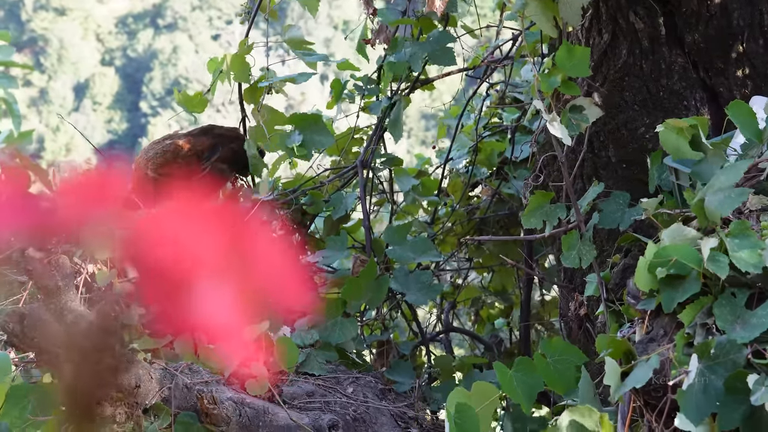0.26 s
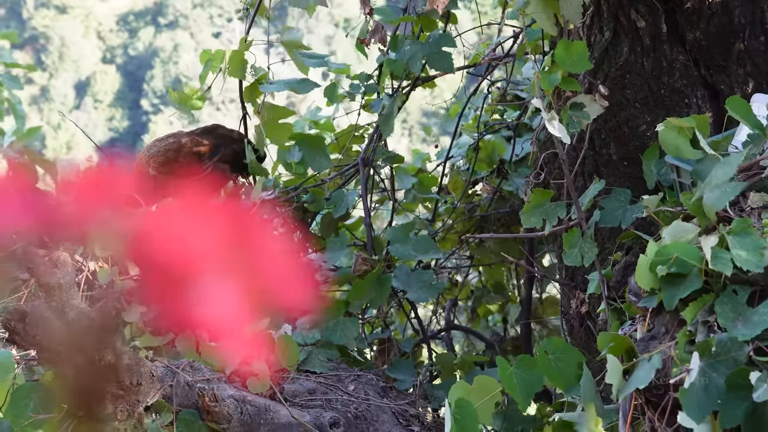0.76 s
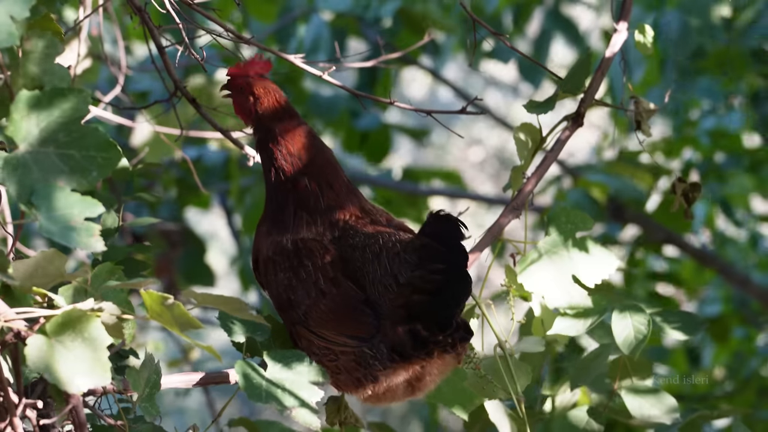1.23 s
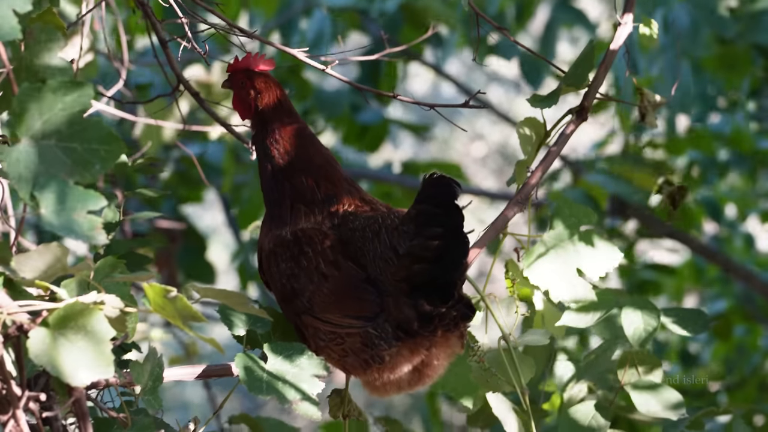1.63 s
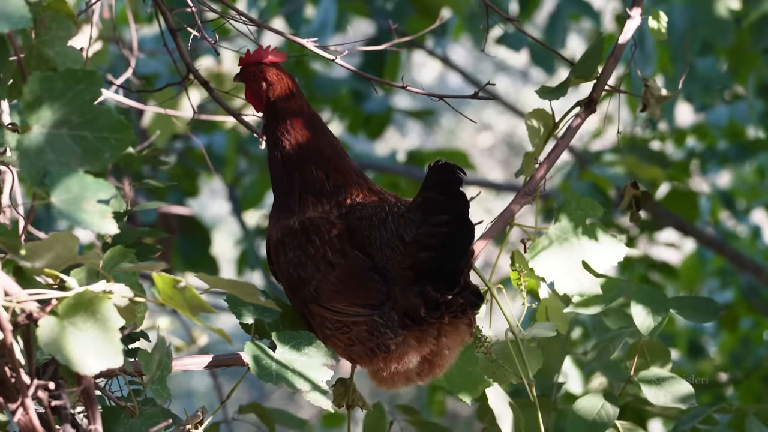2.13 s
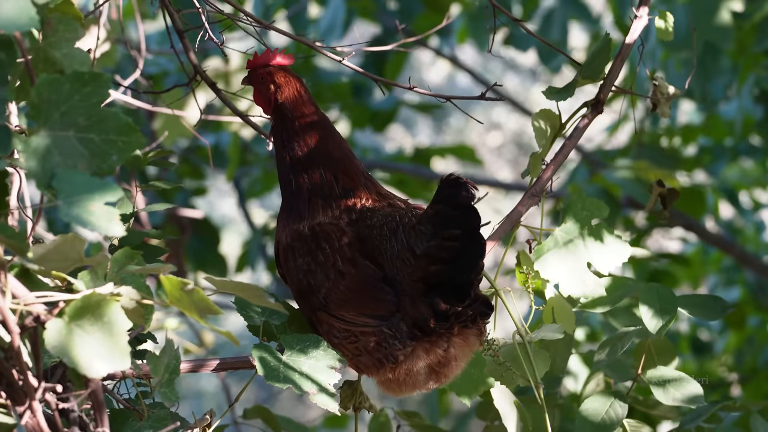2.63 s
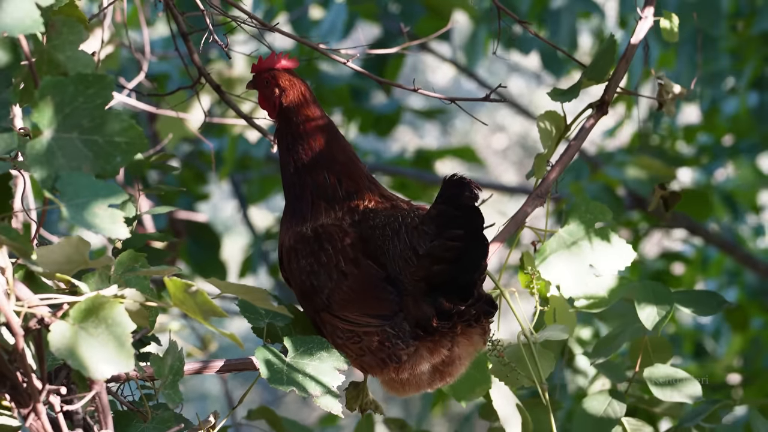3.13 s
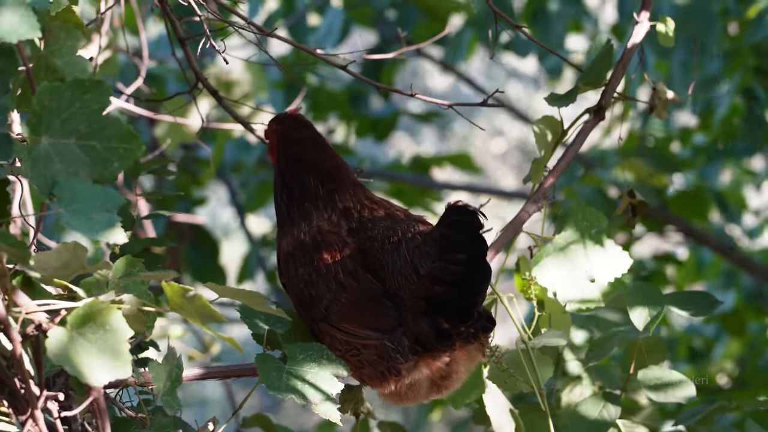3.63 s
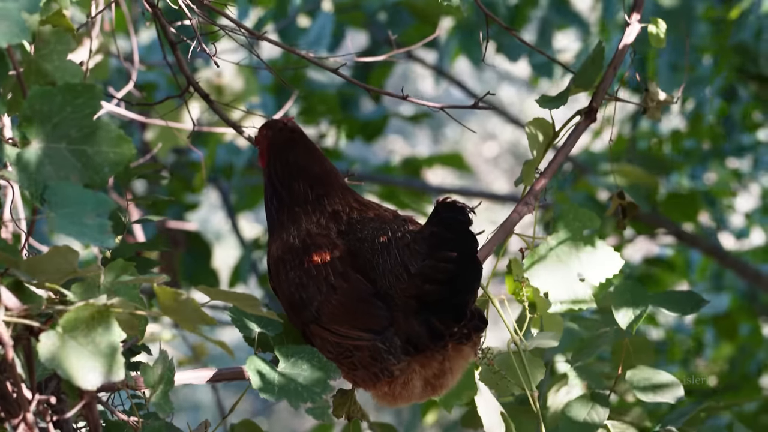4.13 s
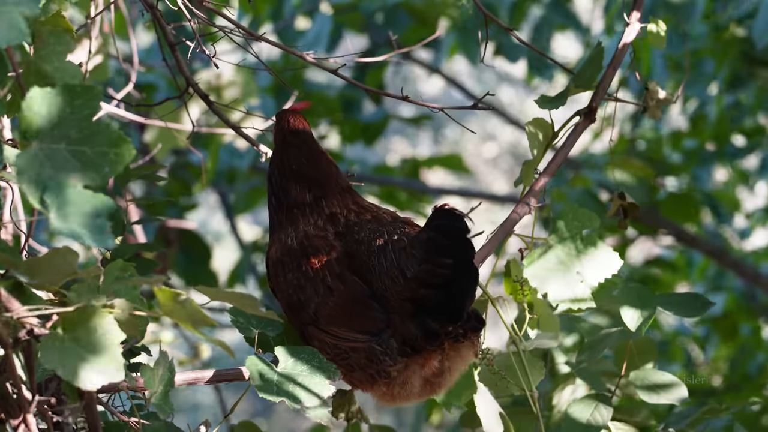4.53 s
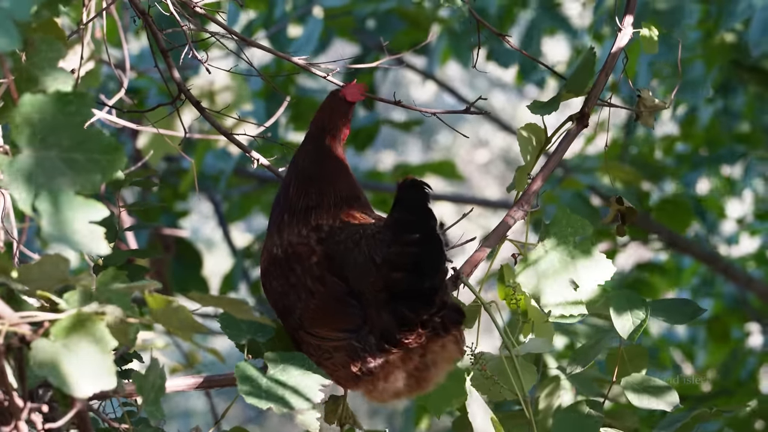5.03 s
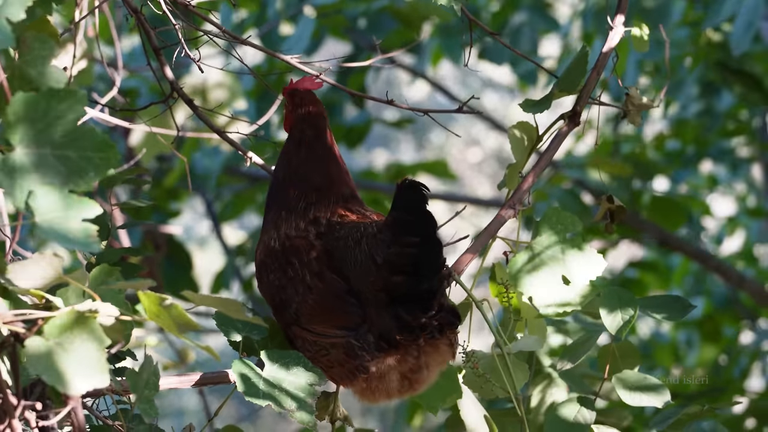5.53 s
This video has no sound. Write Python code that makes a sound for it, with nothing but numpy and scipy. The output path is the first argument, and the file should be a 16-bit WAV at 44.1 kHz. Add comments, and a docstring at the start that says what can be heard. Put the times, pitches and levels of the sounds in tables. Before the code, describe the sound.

A hen a few metres away clucks and twice breaks from a drawn-out note into a loud squawk, over faint outdoor hiss.

```python
"""Hen cackling among leafy branches

A hen cackles twice, a few metres from the microphone. Her short clucks are uneven pulses ringing in crop
and windpipe; they lead up to a drawn-out note that breaks into a loud squawk, then more clucks follow.
The long notes are pulse trains of the syrinx, shaped by throat and beak; a hoarse yelp precedes the second squawk.
Sparse echoes make the yard; filtered noise and a drone make the faint, even hiss, noise bursts the leaf ticks.
"""
import sys
import numpy as np
from scipy import signal
from scipy.fft import rfft, irfft
from scipy.io import wavfile
from scipy.ndimage import uniform_filter1d, minimum_filter1d

SR = 44100
rng = np.random.default_rng(int(sys.argv[2]) if len(sys.argv) > 2 else 0)


def log_audio(samples):
    """Write samples as a 16-bit WAV file to the path given in sys.argv[1]."""
    # one column per channel
    frames = np.atleast_2d(samples).T
    # limit to full scale, then quantise
    limited = np.clip(frames, -1, 1)
    pcm = np.round(limited * 32767).astype(np.int16)
    wavfile.write(sys.argv[1], SR, pcm)


N = 254889  # length [samples]
BINS = abs(np.fft.fftfreq(2048, 1 / SR))  # frequencies at which filters are drawn [Hz]

# Throat with the beak nearly shut: (frequency [Hz], level [dB])
SHUT_THROAT = [(150, -43.5), (300, -22), (530, -23), (800, -13.5), (1080, 1), (1600, -10.5), (2150, -3),
               (2700, -15), (3200, -18), (3650, -13), (5100, -33), (5900, -21.5), (8500, -35.5),
               (15500, -49)]


def amp(db):
    """Decibels to gain."""
    return 10 ** (np.asarray(db) / 20)


def unit(x):
    """Scales to rms 1."""
    return x / np.sqrt(np.mean(x ** 2) + 1e-20)


def read(points, hz):
    """Reads a spectrum on a log-frequency axis."""
    f, value = np.transpose(points)
    return np.interp(np.log(hz + 1), np.log(f + 1), value)


def follow(rows, t):
    """Reads every column of a curve table at the times t."""
    s, *columns = np.transpose(rows)
    return [np.interp(t, s, column) for column in columns]


def add(mix, s, sound):
    """Mixes a sound in at time s."""
    part = mix[round(s * SR):][:len(sound)]
    part += sound[:len(part)]


def band(x, lo_hz, hi_hz):
    """Steep band-pass without delay."""
    sos = signal.butter(4, [lo_hz, min(hi_hz, .49 * SR)], "band", fs=SR, output="sos")
    return signal.sosfiltfilt(sos, x, padtype="even")


def wander(size, hz):
    """Slow random drift of rms 1, up to about the given rate."""
    f = np.fft.rfftfreq(size, 1 / SR)
    return unit(irfft(rfft(rng.standard_normal(size)) / (1 + (f / hz) ** 4), size))


def colour(x, db):
    """Causal filter with the given gain at each of BINS."""
    ring = np.fft.ifft(np.exp(np.conj(signal.hilbert(np.log(amp(db)))))).real
    return signal.fftconvolve(x, ring)[:len(x)]


def hiss(drift_db=0.55, hum_hz=172, hum_db=-85.5):
    """Even outdoor hiss, most alike at both ears in the lower range, with a faint, far, wavering drone."""
    # Spectrum of the hiss: (frequency [Hz], relative level [dB per Hz])
    hiss_spectrum = [(30, -64), (100, -50), (170, -18.5), (300, -19.5), (400, -15), (560, -14), (830, -5),
                     (1300, -4), (2700, -1), (4800, -3.5), (9000, -12.5), (13000, -19.5), (15500, -22.5)]
    # Slow course of its level: (time [s], level [dB])
    hiss_course = [(0, -52.5), (.9, -52), (2.6, -53.5), (4.3, -54.5), (5.78, -52.5)]
    # Likeness of the two ears: (frequency [Hz], left-right correlation [share])
    ear_likeness = [(60, 0.81), (180, 0.99), (550, 0.94), (1650, 0.69), (4970, 0.637), (15000, 0.15)]
    hz = np.fft.rfftfreq(N, 1 / SR)
    left, other = rfft(rng.standard_normal((2, N)))
    same = np.clip(read(ear_likeness, hz), -1, 1)
    right = same * left + np.sqrt(1 - same ** 2) * other
    noise = unit(irfft(np.array([left, right]) * amp(read(hiss_spectrum, hz)), N))
    level_db = follow(hiss_course, np.arange(N) / SR)[0] + drift_db * wander(N, 14)
    turns = np.cumsum(hum_hz * (1 + 0.0066 * wander(N, 21))) / SR
    drone = np.sin(2 * np.pi * turns) * (1 + .4 * wander(N, 6))
    return noise * amp(level_db) + amp(hum_db) * drone


def leaves(decay_s=0.015):
    """Dry leaves tick: brief bursts of spiky noise that die away at once."""
    # Leaf ticks: (time [s], level before the decay [dB])
    leaf_ticks = [(.945, -58), (2.44, -51.5), (2.475, -53), (3.21, -60)]
    out, t = np.zeros(N), np.arange(SR // 10) / SR
    for s, db in leaf_ticks:
        crackle = unit(band(rng.standard_normal(len(t)) ** 3, 2000, 11600))
        add(out, s, amp(db) * np.exp(-t / decay_s) * crackle)
    return out


def cluck(s, db, hz, lift_db, stretch, jitter=.08, shimmer=0.38, air=0.37, fall_s=.01, sag=0.089, shift=0.027):
    """A few slow, uneven pulses that swell and are cut short, ringing in crop and windpipe."""
    # Resonances of the crop: (frequency [Hz], width [Hz], level [dB])
    crop = [(230, 51, -15), (475, 115, -6.5), (769, 93, 5)]
    # Resonances of the windpipe before its stretch: (frequency [Hz], width [Hz], level [dB])
    windpipe = [(982, 99, 4.5), (1320, 140, -8), (1870, 194, 2.5), (2290, 300, -8), (3070, 157, -4),
                (3930, 360, -15.5), (5197, 98, -16), (6260, 830, -25.5), (9800, 3100, -44)]
    swell_s = 9.1 / hz  # builds up over about nine pulses
    t = np.arange(-1.15 * swell_s, .06, 1 / SR)
    push = np.exp(-np.where(t < 0, 1.9 * (t / swell_s) ** 2, abs(t) / fall_s))
    # the rate arches with the push
    turns = np.cumsum(hz * (1 + sag * (push - .7) + jitter * wander(len(t), 150))) / SR
    pulses = np.diff(np.floor(turns), prepend=0) * np.exp(shimmer * rng.standard_normal(len(t)))
    puffs = (.3 + np.exp(-(turns % 1) / 0.41)) * rng.standard_normal(len(t))

    modes = list(crop)
    for f, width, gain in windpipe:
        modes.append((f * stretch * (1 + shift * rng.uniform(-1.64, 1)), width, gain))
    power = sum(amp(gain) ** 2 / (1 + ((BINS - f) / width) ** 2) ** 2 for f, width, gain in modes)
    throat_db = 10 * np.log10(power)
    throat_db += lift_db * read([(1000, 0.063), (1900, 0.86)], BINS)
    throat_db += read([(70, -43), (175, -22)], BINS)
    # forceful clucks are thinner in the bass
    throat_db -= 1.16 * max(db + 29.5, 0) * read([(300, 1), (750, 0)], BINS)
    sound = colour((unit(pulses) + air * unit(puffs)) * push, throat_db)
    loudest = np.sqrt(uniform_filter1d(sound ** 2, size=700).max())
    return s + t[0], amp(db) * sound / loudest


def scatter(x, start_s, t60_of):
    """Two unrelated trains of sparse echoes, each band dying at its own speed."""
    count, spacing = 1500, 20  # one echo in every 20 samples
    taps = np.zeros((2, count * spacing))
    places = np.arange(count) * spacing + rng.integers(0, spacing, (2, count))
    np.put_along_axis(taps, places, rng.choice([-1., 1.], (2, count)), 1)
    hz, t, z = signal.stft(taps, SR, nperseg=256)
    decay = amp(-60 * t / read(t60_of, hz)[:, None])
    tail = signal.istft(z * decay, SR, nperseg=256)[1]
    tail = np.pad(tail / np.linalg.norm(tail[0]), ((0, 0), (round(start_s * SR), 0)))
    return signal.fftconvolve(x[None], tail, axes=1)[:, :N]


def yard(x):
    """Leaves and trunks close by scatter the treble most; the farther yard adds a weak tail, bass near the middle."""
    # Decay of the farther yard: (frequency [Hz], time to fall by 60 dB [s])
    yard_decay = [(200, .6), (800, 0.55), (2000, 0.13), (5000, 0.15), (14000, 0.87)]
    # Width of the echoes: (frequency [Hz], side gain against middle [dB])
    echo_spread = [(200, -28), (600, -23.5), (1500, -9.5), (4000, -7), (10000, 0.5)]
    near = scatter(x, .004, [(300, 0.24), (2000, .19), (10000, 0.18)])
    near_db = read([(300, -4.0), (1000, -3.5), (3000, -0.5), (8000, 6.5)], BINS)
    near = np.array([colour(part, near_db) for part in near])
    middle, side = near + amp(-17.5) * scatter(x, .025, yard_decay)
    side = colour(side, read(echo_spread, BINS))
    return np.array([middle + side, middle - side])


def syrinx(hz, rough, half, jitter=0.0788, waver=0.0027, air=0.89, flutter=0.6, fizz_db=-19):
    """Membrane pulses; weakening every other one gives half lines, roughness shakes them and lets air through."""
    size = len(hz)
    turns = np.cumsum(hz * (1 + jitter * rough * wander(size, 220) + waver * wander(size, 47))) / SR
    whole = sum(np.cos(2 * np.pi * k * turns) for k in range(1, 30))
    between = sum(np.cos(2 * np.pi * (k - .5) * turns) for k in range(1, 30))
    pulses = unit(whole + half * between) * np.exp(flutter * rough * wander(size, 200))
    puffs = unit((0.16 + np.exp(-(turns / 2 % 1) / 0.49)) * rng.standard_normal(size))
    fizz = band(puffs, 4000, 16200)  # the treble is always a little airy
    return (1 - 0.73 * rough) * pulses + air * rough * puffs + amp(fizz_db) * fizz


def resonate(x, hz, width_hz):
    """A resonance of gain 1 that follows the curve hz."""
    turn = np.exp(2j * np.pi * np.cumsum(hz) / SR)
    r = np.exp(-np.pi * width_hz / SR)
    return 2 * (turn * signal.lfilter([1 - r], [1, -r], x / turn)).real


def steady(x, size=400):
    """Holds the running rms at 1."""
    return x / np.sqrt(abs(uniform_filter1d(x ** 2, size=size)) + 1e-12)


def bump(t, s, half_length, squareness=2.87):
    """A push of breath: 1 at time s, falling to 0 on both sides."""
    return np.exp(-abs((t - s) / half_length) ** squareness)


def ramp(t, length):
    """Rises from 0 to 1 over the given length of time."""
    return np.clip(t / length, 0, 1)


def voice(t, hz, rough, half, throat, beak_hz, beak_db, levels_db, edge_s=.014):
    """Syrinx through throat and beak; levels_db sets the lowest resonance, the ring above it and the rasp."""
    # Throat strained wide in a harsh break: (frequency [Hz], level [dB])
    strained_throat = [(150, -76.5), (320, -26), (550, -14.5), (1050, 1), (1500, -5.5), (2500, -10),
                       (3200, -11), (4000, -14.5), (5800, -19.5), (9000, -32), (15500, -45.5)]
    source = syrinx(hz, np.clip(rough, 0, 1), np.clip(half, 0, 1))
    strain = np.clip(3 * (rough - .06), 0, 1)  # the throat widens as the voice breaks
    relaxed = colour(source, read(throat, BINS))
    strained = colour(source, read(strained_throat, BINS))
    sound = (1 - strain) * relaxed + strain * strained
    ringing = sound + amp(beak_db) * resonate(sound, beak_hz, width_hz=88)
    registers = [band(sound, 279, 1448), band(ringing, 1405, 3610), band(sound, 3486, 18000)]
    note = sum(amp(db) * steady(x) for x, db in zip(registers, levels_db))
    return t[0], note * ramp(np.minimum(t - t[0], t[-1] - t), edge_s)


def drawl(row, levels, gain_db=-2, push_db=6, rasp_db=-40.5, rasp_push_db=3.0, push_beak_hz=2220,
          attack_db=-14, attack_s=.022, creak=.6, creak_s=0.022, rough_held=.055, rough_push=0.04, half_push=.22):
    """Starts in a creak, overshoots in pitch and brightness with the push, then settles on a clean held note."""
    start, end, held_hz, push_s, push_length, overshoot, beak_hz, ring_db, chest_db = row
    t = np.arange(start, end, 1 / SR)
    push = bump(t, push_s, push_length, squareness=2)
    onset = bump(t, start, creak_s)
    hz = held_hz * (1 + overshoot * push)
    rough = rough_held + rough_push * push + creak * onset
    upper_db = attack_db * (1 - ramp(t - start, attack_s))
    levels_db = (follow(levels, t)[0] + gain_db,
                 upper_db + ring_db + push_db * push,
                 upper_db + rasp_db + rasp_push_db * push)
    throat = [(f, db + chest_db * (400 < f < 700)) for f, db in SHUT_THROAT]
    return voice(t, hz, rough, half_push * push + onset, throat,
                 beak_hz + (push_beak_hz - beak_hz) * push, beak_db=4.5, levels_db=levels_db)


def squawk(row, levels, gain_db=-3.7, overshoot=.092, scoop=.1, scoop_s=.02, droop=.12, break_s=.034,
           rough_held=0.055, rough_onset=.55, rough_break=0.73, rough_pulsing=0.041,
           push_beak_hz=2500, held_beak_hz=2870, late_beak_hz=3170, beak_lead_s=0.038,
           push_db=12.0, relax_s=0.048, pulsing_db=5, rasp_push_db=13, attack_db=-13, release_db=-9):
    """Scoops up to a harsh high push, drops to a held note, slips into strong-weak pulsing, ends in a droop."""
    # Throat with the beak wide open: (frequency [Hz], level [dB])
    open_throat = [(150, -67.5), (330, -35), (580, -15.5), (950, -7), (1350, 3), (1730, -18), (2050, 0),
                   (2400, -6), (3150, -7.5), (3900, -24.5), (4450, -13.5), (5050, -41.5), (5550, -36.5),
                   (6200, -24), (9500, -34), (15500, -53)]
    start, end, held_hz, push_s, push_length, harsh, pulsing_s, growth_s, ring_db, rasp_db = row
    t = np.arange(start, end, 1 / SR)
    push, onset, ending = bump(t, push_s, push_length), bump(t, start, scoop_s), bump(t, end, break_s)
    pulsing = ramp(t - pulsing_s, growth_s)
    hz = held_hz * (1 + overshoot * push - scoop * onset - droop * ending)
    # the push is roughest while the pitch jumps
    rough = rough_held + harsh * push * (3.3 - 3 * push)
    rough = rough + rough_onset * onset + rough_break * ending + rough_pulsing * pulsing
    late = ramp(t - pulsing_s + beak_lead_s, beak_lead_s)
    beak_hz = held_beak_hz + (push_beak_hz - held_beak_hz) * push + (late_beak_hz - held_beak_hz) * late
    # the brightness ebbs after the push
    force = np.exp(-np.maximum(t - push_s - push_length / 2, 0) / relax_s)
    upper_db = pulsing_db * pulsing + attack_db * onset + release_db * ending
    levels_db = (follow(levels, t)[0] + gain_db,
                 upper_db + ring_db + push_db * force,
                 upper_db + rasp_db + rasp_push_db * force)
    return voice(t, hz, rough, 1.5 * harsh * push + 0.85 * pulsing, open_throat, beak_hz, beak_db=7,
                 levels_db=levels_db)


def yelp(start, end, hz, push_s, push_length, overshoot=.04, rough=.42, half=0.33, beak_hz=2100, fade_s=0.027):
    """One hoarse push that flares up and fades to a weak tone."""
    t = np.arange(start, end, 1 / SR)
    push = bump(t, push_s, push_length)
    force = np.where(t < push_s, push, bump(t, push_s, fade_s, squareness=1.4))
    levels_db = [weak_db + rise_db * force for weak_db, rise_db in [(-27, 8.7), (-40.5, 20.3), (-44.5, 12)]]
    return voice(t, hz * (1 + overshoot * push), rough * ramp(t - start, 0.021), half * push, SHUT_THROAT,
                 np.full(len(t), beak_hz), beak_db=5.5, levels_db=levels_db)


def scene():
    """The hen a little to the left, her echoes, and the background."""
    # Clucks: (peak of the push [s], level [dB], nominal pulse rate [Hz], treble lift [dB],
    # stretch of the windpipe's resonances [factor])
    cluck_rows = [(.962, -52, 348, -19, 1.07), (1.126, -38, 385, -10, 1.02),
                  (1.194, -28, 250.5, -5.5, 1.04), (1.885, -21, 235, -4, 0.974),
                  (2.111, -28.5, 246.4, -1.5, 0.97), (3.46, -43.5, 367.3, -12, 1.04),
                  (3.644, -41.5, 372, -13, 1.06), (3.83, -34.5, 258, -1, 1.03),
                  (4.029, -32, 268.2, 0, 1.05), (4.228, -31.5, 259.5, -1, 1.06),
                  (4.43, -26.5, 254.7, 3, 1.03), (4.631, -25, 246.2, -2.5, 1.02),
                  (4.797, -32.5, 383, -6.5, 1.07), (4.849, -23.5, 255.4, -4, 1.014),
                  (5.588, -20.5, 233.6, -3, 0.96)]
    # Drawn-out notes: (start [s], end [s], held pitch [Hz], opening push [s], its half length [s],
    # pitch overshoot [share], beak resonance [Hz], ring of the throat once the push has ebbed [dB],
    # lift of the fundamental [dB])
    drawl_rows = [(1.18, 1.394, 533, 1.213, .038, .062, 2690, -31, -1.5),
                  (4.865, 5.055, 505.1, 4.902, .04, .096, 3540, -32.5, 7)]
    # Lowest throat resonance before the drawl's gain, one curve a note: (time [s], level [dB])
    drawl_curves = [
        [(1.19, -41), (1.198, -28.5), (1.262, -20.5), (1.292, -29.5), (1.316, -20), (1.375, -21)],
        [(4.87, -29.5), (4.926, -19.5), (4.936, -29), (4.968, -28.5), (5.016, -20), (5.04, -20)],
    ]
    # Squawks: (start [s], end [s], held pitch [Hz], opening push [s], its half length [s], harshness [0-1],
    # onset of strong-weak pulsing [s], its growth time [s], ring of the throat once the push has ebbed [dB],
    # rasp once the push has ebbed [dB]); the pulsing and the ending shift ring and rasp further
    squawk_rows = [(1.372, 1.755, 574.7, 1.437, .042, 0.36, 1.6, 0.081, -29.5, -41),
                   (5.14, 5.439, 575.9, 5.182, .027, .18, 5.265, 0.034, -27.5, -42.5)]
    # Lowest throat resonance before the squawk's gain, one curve a note: (time [s], level [dB])
    squawk_curves = [
        [(1.375, -17.5), (1.477, -20), (1.491, -12.5), (1.531, -18), (1.551, -12), (1.691, -13), (1.745, -24.5)],
        [(5.145, -19), (5.157, -15.5), (5.255, -17), (5.273, -13), (5.399, -17.5), (5.43, -24)],
    ]
    # Hoarse yelp: (start [s], end [s], pitch before the overshoot [Hz], push [s], its half length [s])
    yelp_row = (5.04, 5.15, 503, 5.074, .02)
    # Lean to the left: (frequency [Hz], left minus right [dB])
    left_lean = [(60, 3), (180, -1), (550, 1), (1650, 4), (4970, 1.5), (15000, -0.5)]

    notes, clucks = np.zeros((2, N))
    for row in cluck_rows:
        add(clucks, *cluck(*row))
    for row, levels in zip(drawl_rows, drawl_curves):
        add(notes, *drawl(row, levels))
    for row, levels in zip(squawk_rows, squawk_curves):
        add(notes, *squawk(row, levels))
    add(notes, *yelp(*yelp_row))
    echoes = yard(amp(-1.0) * notes + amp(1.0) * clucks)
    left, right = notes + clucks + echoes
    lean_db = read(left_lean, BINS) / 2
    hen = np.array([colour(left, lean_db), colour(right, -lean_db)])
    return hen + hiss() + leaves()


def record(dry, edge_hz=15650):
    """A smooth peak limiter, then a steep low-pass that ends the treble."""
    gain = np.minimum(1, .8 / (abs(dry).max(0) + 1e-9))
    gain = uniform_filter1d(minimum_filter1d(gain, size=500), size=500)
    low_pass = signal.firwin(511, edge_hz, window=("kaiser", 9), fs=SR)
    return signal.oaconvolve(dry * gain, low_pass[None], "same")


dry = scene()
out = record(dry)
log_audio(out)
```